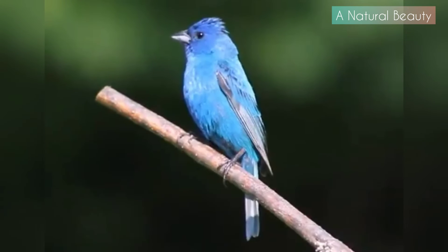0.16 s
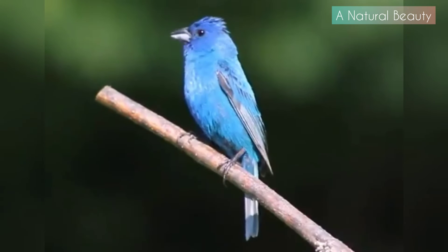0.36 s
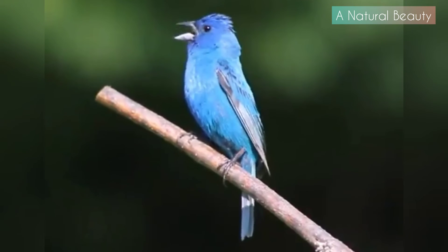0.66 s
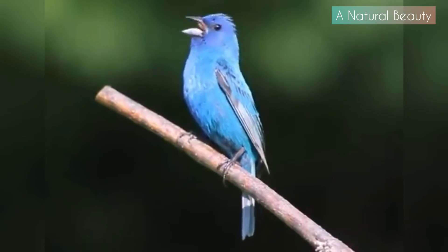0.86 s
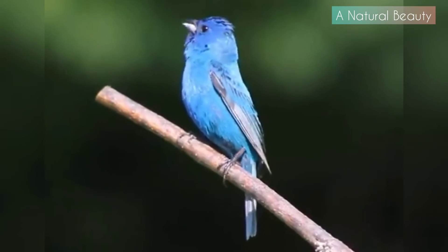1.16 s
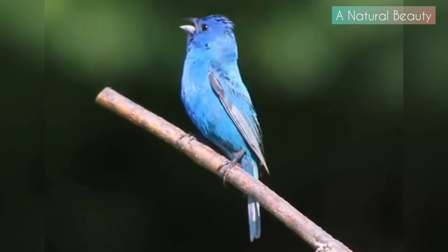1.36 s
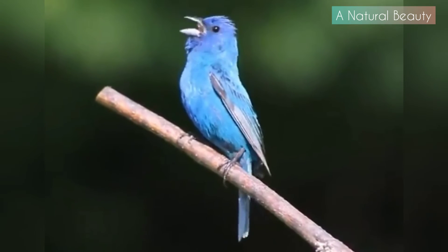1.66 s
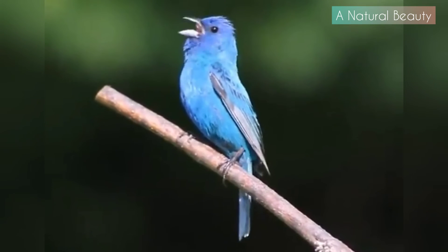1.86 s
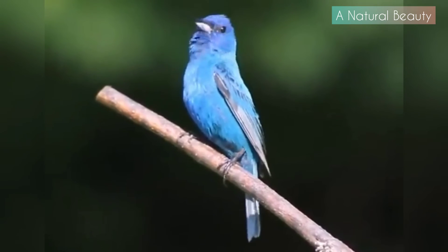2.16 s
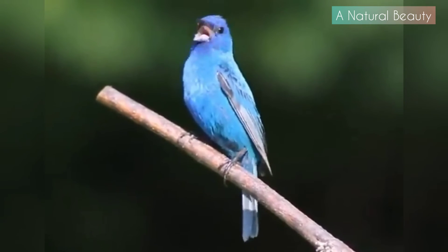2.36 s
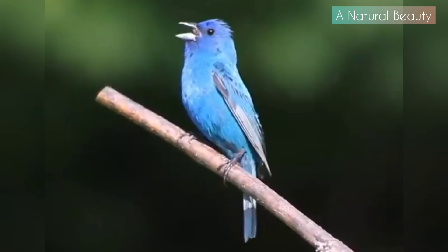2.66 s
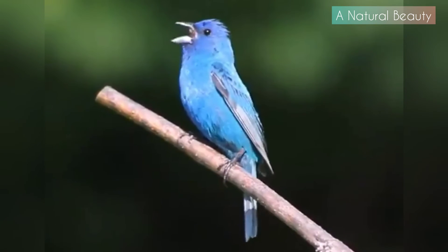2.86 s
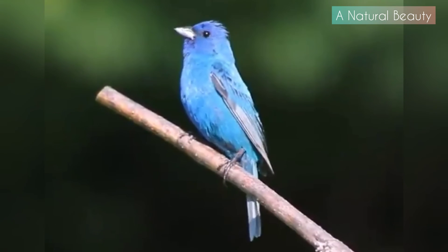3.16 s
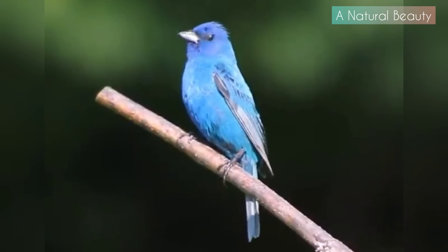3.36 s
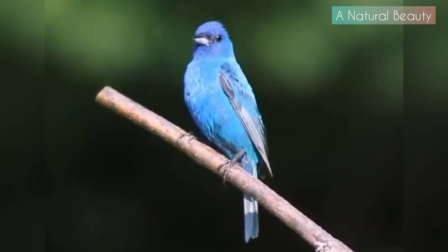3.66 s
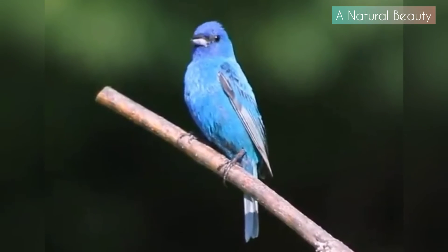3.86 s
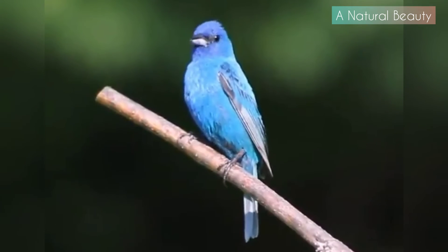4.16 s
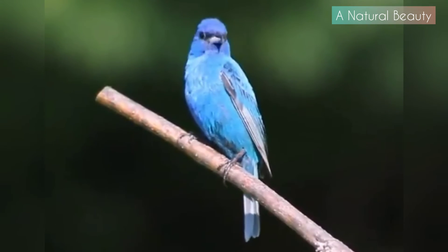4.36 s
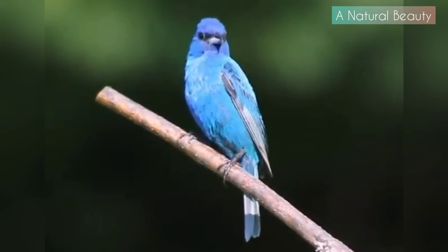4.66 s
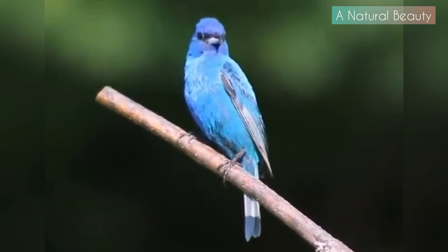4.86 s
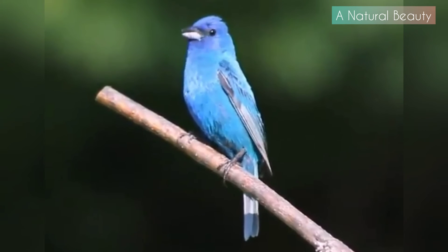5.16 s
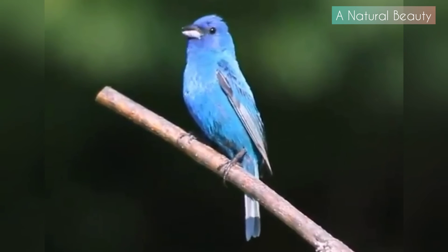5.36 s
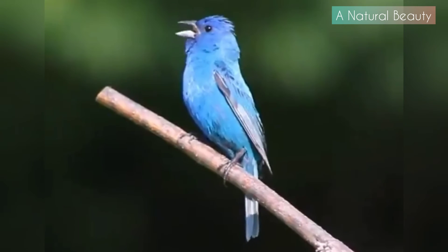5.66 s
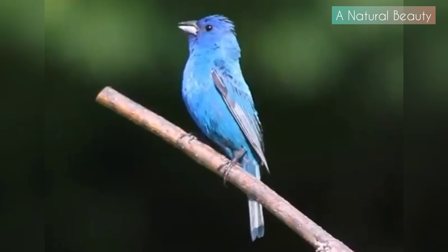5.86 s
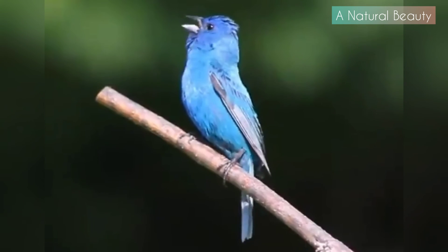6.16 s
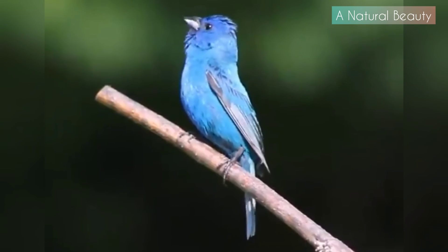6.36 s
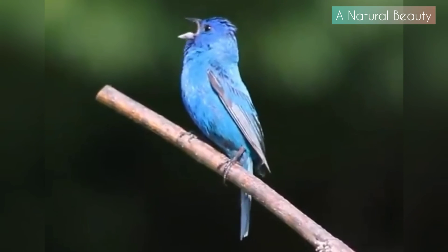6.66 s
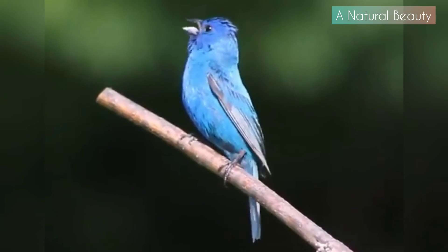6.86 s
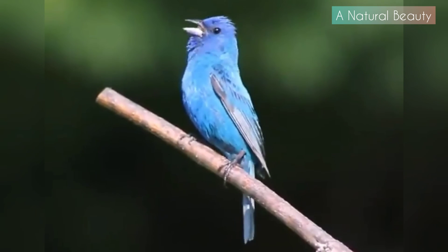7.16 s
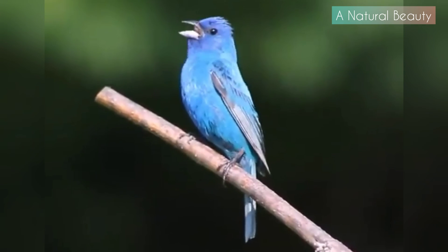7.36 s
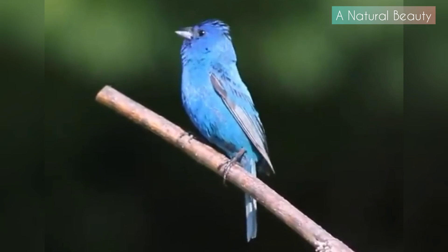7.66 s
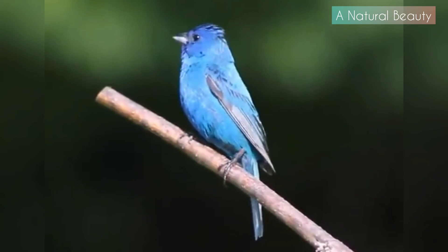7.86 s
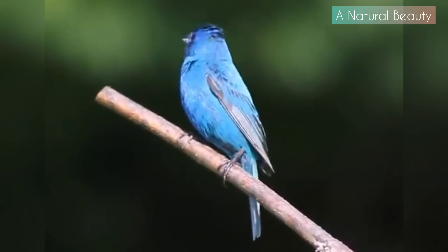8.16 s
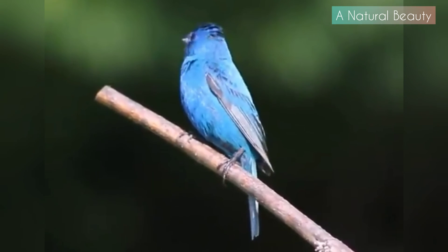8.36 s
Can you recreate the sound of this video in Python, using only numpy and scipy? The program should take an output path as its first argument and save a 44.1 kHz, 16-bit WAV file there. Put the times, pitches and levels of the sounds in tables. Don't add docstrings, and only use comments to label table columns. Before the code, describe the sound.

A small songbird sings two bright, high phrases of swept whistles, quick buzzes and warbles over faint woodland hiss, with a short pause between.

```python
import sys
import numpy as np
from scipy import signal
from scipy.fft import rfft
from scipy.io import wavfile
from scipy.ndimage import uniform_filter1d

SR = 44100
rng = np.random.default_rng(int(sys.argv[2]) if len(sys.argv) > 2 else 0)


def gain_from_decibels(decibels):
    exponent = np.asarray(decibels, float) / 20
    return 10 ** exponent


def output_pcm(signal):
    pcm = np.clip(np.atleast_2d(signal).T, -1, 1) * 32767
    wavfile.write(sys.argv[1], SR, np.round(pcm).astype(np.int16))


N = 375291
END_S = 7.726

SCENE_STARTS = (0, 2.004, 5.2705)
# frequency_hz, density_db (per Hz)
AIR_SPECTRUM = [(12, -37), (20, -1), (27, -9), (91, 1.5), (275, -8.5), (305, -3.5), (339, -7.5), (871, -4),
                (942, -5.5), (3060, -13.5), (4660, -15), (5040, -15.5), (6550, -19.5), (7470, -14.5),
                (10500, -23.5), (13600, -56), (22000, -120)]
# time_s, level_db
AIR_LEVEL = [(0, -47), (2.5, -48), (4.5, -47), (5.5, -48), (6.2, -49.5), (6.8, -52), (7.3, -53), (7.7, -54)]
# start_s, end_s, pitch_hz, level_db
THIN_TONES = [(0, 3.95, 5130, -64.5), (3.1, 4.9, 5841, -68.5), (0, 3.9, 6191, -65.5),
              (3.05, 3.9, 6901, -69), (3.05, 3.95, 7251, -65.5), (2.3, 3.2, 7420, -66.5),
              (3.2, 4.45, 7435, -71), (2.5, 3.0, 5480, -70), (3.8, 4.45, 7800, -68), (3.9, 4.5, 7084, -70),
              (3.9, 4.4, 6024, -71), (4.4, 4.9, 5140, -67), (2.5, 3.1, 6713, -72), (3.24, 3.33, 3967, -66),
              (0, 2.3, 7251, -68), (4.45, 4.8, 7450, -63), (4.72, 5.05, 7900, -62), (1.55, 2.06, 7750, -63),
              (1.7, 2.05, 8200, -65), (2.1, 3.9, 7600, -73), (2.1, 4.7, 8470, -71.5), (2.3, 4.7, 8800, -75),
              (3.2, 4.9, 888, -60), (4.8, 7.7, 323, -63), (7.2, 7.7, 880, -68)]
# start_s, length_s, top_hz, level_db
WIND_PUFFS = [
    (4.397, 0.12, 129, -49),
    (4.575, 0.06, 198, -30),
    (4.65, 0.055, 180, -44),
    (4.713, 0.06, 88, -33.5),
    (4.919, .08, 117, -39),
    (5.21, .03, 131.4, -45),
    (5.25, 0.027, 150, -45.5),
]
# start_s, level_db
DRY_TICKS = [
    (2.004, -43),
    (4.31, -49),
    (4.328, -46),
    (4.441, -39),
    (4.567, -35),
    (4.578, -40),
    (4.627, -39),
    (5.27, -42),
    (5.321, -42),
]
# start_s, length_s, start_hz, end_hz, level_db
DISTANT_CHIRPS = [
    (3.678, 0.022, 4100, 3500, -54),
    (3.79, 0.02, 5220, 3900, -53),
    (3.906, 0.043, 4010, 3500, -59),
    (7.082, 0.023, 4400, 3600, -53),
    (7.214, 0.052, 4830, 2900, -59.5),
    (7.319, .045, 4950, 3400, -56.5),
    (7.426, 0.047, 4750, 3000, -57.5),
    (7.534, 0.036, 4780, 3100, -55.5),
]
# start_s, length_s, start_hz, end_hz, level_db
NOTE_SCRAPS = [
    (0.002, .07, 4570, 4190, -49),
    (2.004, .022, 7200, 5800, -43),
    (2.028, .028, 5750, 6600, -43),
    (5.252, .018, 3440, 3230, -42),
    (5.275, .05, 3100, 2750, -50),
    (5.34, .06, 2800, 3100, -58),
]
# frequency_hz, density_db (per Hz)
TREBLE_SPECTRUM = [(6120, -33), (10400, -5), (14300, 2), (15400, -5.5), (15700, -7.5)]
# time_s, level_db
GRAIN_LEVEL = [(0, -20), (5.2, -20), (5.23, -40), (5.275, -40), (5.3, -20), (6.4, -19), (6.43, -15),
               (6.47, -8), (6.9, -9)]
# centre_s, loss_db
HISS_DIPS = [(.12, 10), (1.11, 6), (2.59, 5), (2.91, 8), (3.115, 14), (3.305, 15), (3.57, 5), (4.0, 7),
             (4.52, 4), (4.76, 8), (4.83, 4), (5.05, 5), (5.43, 4), (5.8, 5), (6.12, 4), (6.65, 5),
             (6.76, 5), (6.93, 5), (7.18, 15), (7.63, 6)]

# time_s (from note start), pitch_hz, level_db
DIP = [(0, 4950, -24), (.011, 4640, -4), (.018, 4370, 1), (.03, 4040, -4), (.041, 3950, -30)]
FLAT = [(0, 5000, -22), (.009, 5100, -4), (.028, 5070, 0), (.051, 5130, -6), (.064, 5200, -18)]
FALL = [(0, 7750, -31), (.012, 7450, -14), (.033, 6900, -1), (.06, 6230, -2), (.072, 6030, 1),
        (.082, 5970, -3), (.09, 5950, -24)]
RISE = [(0, 2400, -26), (.006, 5100, -15), (.01, 6050, 0), (.03, 6580, -.5), (.048, 7230, -1),
        (.057, 7450, -20)]
SCOOP = [(0, 3370, -18), (.008, 3250, -8), (.018, 3140, 1.5), (.05, 2740, -4), (.066, 2720, -20)]
CREST = [(0, 2750, -23), (.02, 3350, -9), (.045, 3960, .5), (.067, 4740, -1), (.082, 5120, -5),
         (.095, 5170, -7.5), (.118, 4620, 0), (.138, 4250, 2), (.161, 4150, -20)]
HOOK = [(0, 5800, 0), (.012, 5050, -1), (.024, 4620, -9), (.034, 4850, -2), (.046, 5100, -6),
        (.062, 5120, -12)]
GRACE = [(0, 5900, 0), (.005, 6500, -3), (.01, 7000, -3)]
FLICK = [(0, 4500, -24), (.005, 5300, -5), (.011, 6300, 0), (.016, 7100, -9)]
DROP = [(0, 4150, -5), (.007, 4700, -4), (.016, 4600, 0), (.024, 4300, 1.5), (.032, 3250, -7),
        (.04, 2500, -27), (.046, 2280, -32)]
SLIDE = [(0, 2480, -18), (.006, 2680, -11), (.028, 3070, -6), (.05, 3245, -.5), (.075, 3350, -2.5),
         (.093, 3400, -11), (.105, 3420, -22)]
HUMP = [(0, 3050, -22), (.008, 3130, -7), (.025, 3310, 0), (.041, 3470, -1), (.06, 2920, -8),
        (.071, 2790, -20)]
VEE = [(0, 8550, -45), (.006, 8020, -22), (.012, 7300, -10), (.025, 6020, .5), (.034, 5680, -8),
       (.044, 5730, 2), (.064, 6670, -12.5), (.073, 6600, -21)]
PIP = [(0, 7000, -20), (.012, 7550, 0), (.022, 8050, -5), (.037, 8250, -22)]
ARCH = [(0, 2330, -30), (.01, 2700, -32), (.016, 3150, -12), (.026, 4300, 2.5), (.041, 5800, -3),
        (.051, 6400, -8), (.062, 6440, -6), (.07, 4550, -4), (.078, 3500, -4), (.092, 3050, -22)]
HIGH_BUZZ = [(0, 6600, -26), (.012, 6750, -13), (.028, 6800, -2), (.05, 6350, 0), (.065, 5850, -4)]
LOW_BUZZ = [(0, 4420, -20), (.007, 4500, -3), (.028, 4550, 0), (.043, 4620, -3), (.052, 4680, -14)]
WARBLE = [(0, 3950, -11), (.01, 3760, 0), (.04, 3770, 0), (.124, 3870, -.5), (.135, 3910, -10)]
SIGH = [(0, 6000, -8), (.025, 5750, 0), (.036, 5920, -2), (.045, 5700, -12)]
SINK = [(0, 5500, -20), (.01, 5350, -4), (.025, 5330, 0), (.04, 5300, -4), (.046, 5250, -20)]

# shape, start_s, length_s, top_pitch_hz, level_db
FIRST_SONG = [(FLAT, -.038, .064, 5230, -25), (FALL, .022, .088, 7750, -25), (DIP, .18, .041, 4950, -18.5),
              (FLAT, .227, .063, 5190, -23.5), (FALL, .285, .09, 7750, -22), (RISE, .46, .059, 7470, -27.5),
              (SCOOP, .515, .064, 3370, -30), (CREST, .579, .164, 5140, -16), (RISE, .816, .055, 7470, -25),
              (SCOOP, .872, .066, 3370, -27), (CREST, .936, .16, 5150, -14), (HOOK, 1.223, .06, 5850, -14),
              (GRACE, 1.491, .01, 7050, -44), (FLICK, 1.5, .016, 7150, -16),
              (FLICK, 1.514, .016, 7000, -14), (DROP, 1.529, .046, 4700, -15),
              (SLIDE, 1.589, .098, 3450, -18), (GRACE, 1.745, .01, 6980, -41),
              (FLICK, 1.754, .016, 7100, -14.5), (FLICK, 1.768, .016, 6850, -12),
              (DROP, 1.783, .046, 4680, -13.2), (SLIDE, 1.84, .108, 3400, -18),
              (HUMP, 1.983, .07, 3470, -21), (VEE, 2.144, .073, 8550, -15), (HUMP, 2.217, .072, 3455, -22)]
# shape, start_s, length_s, top_pitch_hz, level_db
SECOND_SONG = [(SIGH, 4.449, .043, 6000, -40.5), (SINK, 4.496, .046, 5500, -24.5),
               (DIP, 4.644, .043, 5000, -25), (FLAT, 4.69, .063, 5220, -25.5),
               (FALL, 4.748, .095, 7800, -26), (DIP, 4.92, .042, 4950, -19.5),
               (FLAT, 4.964, .068, 5200, -26.5), (FALL, 5.025, .094, 7750, -22),
               (RISE, 5.203, .055, 7500, -27.5), (CREST, 5.219, .157, 5130, -15.8),
               (RISE, 5.459, .056, 7450, -23), (SCOOP, 5.515, .066, 3390, -27),
               (CREST, 5.58, .159, 5130, -16.3), (HOOK, 5.867, .066, 5850, -18),
               (HOOK, 6.178, .068, 5780, -20), (PIP, 6.429, .038, 8250, -23.5),
               (PIP, 6.589, .038, 8300, -24), (PIP, 6.749, .037, 8200, -24)]
# shape, start_s, length_s, top_pitch_hz, level_db
ARCHES = [
    (ARCH, 6.462, .095, 6470, -19.7),
    (ARCH, 6.622, .093, 6350, -21.5),
    (ARCH, 6.786, .093, 6280, -24.2),
]
# shape, start_s, length_s, top_pitch_hz, level_db
HIGH_BUZZES = [
    (HIGH_BUZZ, 1.166, .065, 6720, -15.5),
    (HIGH_BUZZ, 5.813, .062, 6750, -19.5),
    (HIGH_BUZZ, 6.125, .062, 6710, -21.5),
]
# shape, start_s, length_s, top_pitch_hz, level_db
LOW_BUZZES = [
    (LOW_BUZZ, 2.056, .051, 4620, -15),
    (LOW_BUZZ, 2.292, .048, 4700, -17),
]
# shape, start_s, length_s, top_pitch_hz, level_db
WARBLES = [
    (WARBLE, 1.279, .135, 3950, -16),
    (WARBLE, 5.922, .135, 3940, -19),
    (WARBLE, 6.235, .135, 3930, -20.6),
]


def evened(x):
    return x / np.sqrt(np.mean(x ** 2) + 1e-20)


def read(points, hz):
    f, value = np.transpose(points)
    return np.interp(np.log(hz + 1), np.log(f + 1), value)


def add(mix, s, sound):
    part = mix[round(s * SR):][:len(sound)]
    part += sound[:len(part)]


def drift(count, span):
    size = max(int(span * SR), 2)
    return evened(uniform_filter1d(uniform_filter1d(rng.standard_normal(count), size), size))


def smooth(grid, bins, frames):
    return uniform_filter1d(uniform_filter1d(grid, size=bins, axis=0), size=frames, axis=1)


def air():
    frames, hz = N // 256 + 5, np.fft.rfftfreq(1024, 1 / SR)
    real, imag, patches = rng.standard_normal((frames, 513, 3)).T
    patches = evened(smooth(patches, 10, 10))
    fall_db = np.interp(np.arange(frames) * 256 / SR, *np.transpose(AIR_LEVEL)) - AIR_LEVEL[1][1]
    dulling_db = .8 * fall_db * np.clip(hz / 3000 - 1.5, 0, 1)[:, None]
    z = (real + 1j * imag) * gain_from_decibels(read(AIR_SPECTRUM, hz)[:, None] + 1.7 * patches + dulling_db)
    hiss = evened(signal.istft(z, nperseg=1024, noverlap=768)[1][:N])
    out = gain_from_decibels(np.interp(np.arange(N) / SR, *np.transpose(AIR_LEVEL))) * hiss
    for start, end, tone_hz, db in THIN_TONES:
        t = np.arange(start, end, 1 / SR)
        gate = np.clip(np.minimum(t - start, end - t) / .04, 0, 1)
        phase = 2 * np.pi * np.cumsum(tone_hz + 4.0 * drift(len(t), .03)) / SR
        level = gain_from_decibels(db + 1.5 * drift(len(t), .05))
        add(out, start, np.sqrt(2) * level * gate * np.sin(phase))
    return out


def wind():
    out = np.zeros(N)
    for s, length, top_hz, db in WIND_PUFFS:
        band = signal.butter(2, [top_hz / 3, top_hz], "band", fs=SR, output="sos")
        push = signal.sosfilt(band, rng.standard_normal(SR // 4))
        push = evened(push[-int(length * SR):])
        add(out, s, gain_from_decibels(db) * push * signal.windows.tukey(len(push), .6))
    decay = np.exp(-np.arange(1200) / 260)
    tick_band = signal.butter(2, [1600, 5500], "band", fs=SR)
    for s, db in DRY_TICKS:
        add(out, s, gain_from_decibels(db) * signal.lfilter(*tick_band, rng.standard_normal(len(decay))) * decay)
    return out


def note(rows, swing_hz, rate_hz, throb, waver=0.0046):
    s, hz, db = np.transpose(rows)
    t = np.arange(s[0] - .002, s[-1] + .003, 1 / SR)
    cycle = 2 * np.pi * rate_hz * (t - s[0])
    swing = -np.cos(cycle) - .24 * np.cos(2 * cycle)
    glide = uniform_filter1d(np.interp(t, s, hz), size=130, mode="nearest")
    pitch = glide * (1 + waver * drift(SR // 5, .002)[:len(t)])
    pitch = pitch + swing_hz * swing * np.linspace(.7, 1.12, len(t))
    phase = 2 * np.pi * np.cumsum(pitch) / SR
    tone = np.sqrt(2) * np.sin(phase) + gain_from_decibels(-47) * np.sin(2 * phase)
    flutter_db = 2.7 * np.minimum(drift(SR // 5, .003)[:len(t)], .6)
    level = gain_from_decibels(np.interp(t, s, db) + flutter_db) * np.clip(1 + throb * swing, .05, None)
    edges = np.clip(np.minimum(t - t[0], t[-1] - t) / 0.0027, 0, 1)
    return t[0], level * edges * tone


def far_bird():
    out = np.zeros(N)
    for s, length, start_hz, end_hz, db in DISTANT_CHIRPS + NOTE_SCRAPS:
        middle = (s + length / 2, (start_hz + end_hz) / 2, db + 3)
        rows = [(s, start_hz, db + 2), middle, (s + length, end_hz, db + 1)]
        add(out, *note(rows, swing_hz=0, rate_hz=0, throb=0, waver=.012))
    blur = rng.standard_normal(1500) * np.exp(-np.arange(1500) / 150)
    return gain_from_decibels(-4) * signal.fftconvolve(out, blur / np.linalg.norm(blur))[:N]


def placed(shape, start, length, top_hz, db):
    s, hz, rel_db = np.transpose(shape)
    times = start + (s - s[0]) * length / (s[-1] - s[0])
    return np.transpose([times, hz * top_hz / hz.max(), rel_db + db])


def songbird():
    out = np.zeros(N)
    voices = [(FIRST_SONG + SECOND_SONG, dict(swing_hz=0, rate_hz=0, throb=0)),
              (ARCHES, dict(swing_hz=0, rate_hz=0, throb=0, waver=.015)),
              (HIGH_BUZZES, dict(swing_hz=480, rate_hz=166, throb=.2, waver=.012)),
              (LOW_BUZZES, dict(swing_hz=370, rate_hz=173, throb=.5, waver=.014)),
              (WARBLES, dict(swing_hz=540, rate_hz=37.6, throb=.58))]
    for notes, voice in voices:
        for row in notes:
            s, sound = note(placed(*row), **voice)
            heard = max([s] + [cut for cut in SCENE_STARTS if s < cut < s + len(sound) / SR])
            kept = sound[round((heard - s) * SR):]
            add(out, heard, kept * np.minimum(np.arange(len(kept)) / 40, 1))
    return out


def wood(x):
    t = np.arange(SR // 2) / SR
    taps = rng.standard_normal(len(t)) * (rng.random(len(t)) < .09) * (t > .0012)
    leaves = gain_from_decibels(-17.8) * gain_from_decibels(-60 * t / .05)
    tree_line = gain_from_decibels(-36) * np.exp(-((t - .088) / .0105) ** 2)
    clearing = np.interp(t, [.02, .045, .07, .085], [1, .36, .36, 1])
    tail = clearing * gain_from_decibels(-31.5) * gain_from_decibels(-60 * t / 0.6)
    far = signal.lfilter([.45], [1, -.55], taps * np.sqrt(tree_line ** 2 + tail ** 2))
    far = signal.lfilter(*signal.butter(2, 2200, "high", fs=SR), far)
    path = taps * leaves + far + (t == 0)
    song_band = abs(rfft(path))[1500:3500]
    return gain_from_decibels(0.2) * signal.fftconvolve(x, path / np.sqrt(np.mean(song_band ** 2)))[:N]


def scene():
    return (wood(songbird() + far_bird()) + air() + wind())[None]


def grained(z, hz, t):
    power = abs(z) ** 2
    near, wide = smooth(power, 14, 6) + 1e-18, smooth(power, 40, 6) + 1e-18
    real, imag = rng.standard_normal((len(t), len(hz), 2)).T
    dropped = rng.random((len(t) // 8 + 1, 86)).T.repeat(8, axis=1).repeat(6, axis=0) < .3
    dropped = dropped[:len(hz), :len(t)]
    z = z * gain_from_decibels(-22 * (dropped & (near < wide * gain_from_decibels(-40))))
    grain = gain_from_decibels(np.interp(t, *np.transpose(GRAIN_LEVEL))) * np.sqrt(abs(near)) * (real + 1j * imag)
    return z + grain * (hz > 2000)[:, None]


def copied_treble(z, hz, t, high, fade):
    copy = np.roll(z, 176, axis=0) * high
    power = smooth(abs(copy) ** 2, 130, 11) + 1e-18
    rest = gain_from_decibels(read(TREBLE_SPECTRUM, hz)[:, None] - 34) * fade
    real, imag, broken = rng.standard_normal((len(t), len(hz), 3)).T
    broken = gain_from_decibels(2.5 * evened(smooth(broken, 16, 3)))
    treble = copy / np.sqrt(power) * (power / (gain_from_decibels(-33) * fade) ** 2) ** 0.11
    lines = smooth(abs(treble) ** 2, 12, 3)
    treble = treble * broken ** np.clip(lines - 1, 0, 1) / (1 + lines) ** 0.18
    blocks = rng.standard_normal((len(t) // 14 + 1, 11)).T.repeat(14, axis=1).repeat(50, axis=0)
    blocks = blocks[:len(hz), :len(t)]
    treble = treble + gain_from_decibels(-8 + 5.0 * blocks * (lines < .3)) * (real + 1j * imag)
    treble = treble * gain_from_decibels(-25 * ((blocks < -1.1) & (lines < .3)))
    return treble * rest


def band_limit(x):
    return signal.sosfilt(signal.butter(12, 15840, fs=SR, output="sos"), x)


def record(dry):
    hz, t, z = signal.stft(dry[0], SR, nperseg=1024, noverlap=768)
    z = grained(z, hz, t)
    high = (hz > 10480)[:, None]
    fade = gain_from_decibels(np.interp(t, *np.transpose(AIR_LEVEL)))
    z = np.where(high, copied_treble(z, hz, t, high, fade), z)
    loss_db = sum(db * np.exp(-((t - s) / 0.017) ** 4) for s, db in HISS_DIPS)
    quiet = abs(z) < gain_from_decibels(-22) * fade
    z = z * gain_from_decibels(-loss_db * quiet * np.clip(hz / 900, 0, 1)[:, None])
    x = signal.istft(z, SR, nperseg=1024, noverlap=768)[1][:N]
    x = (x + .0015) * np.clip((END_S - np.arange(N) / SR) / .002, 0, 1)
    return band_limit(x[None])


dry = scene()
out = record(dry)
output_pcm(out)
```